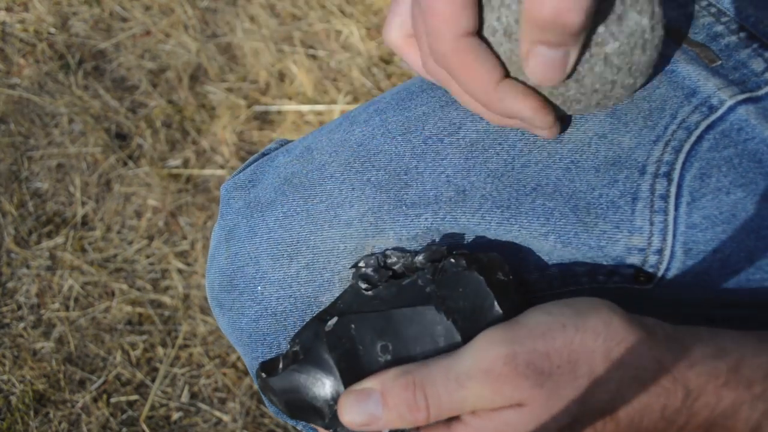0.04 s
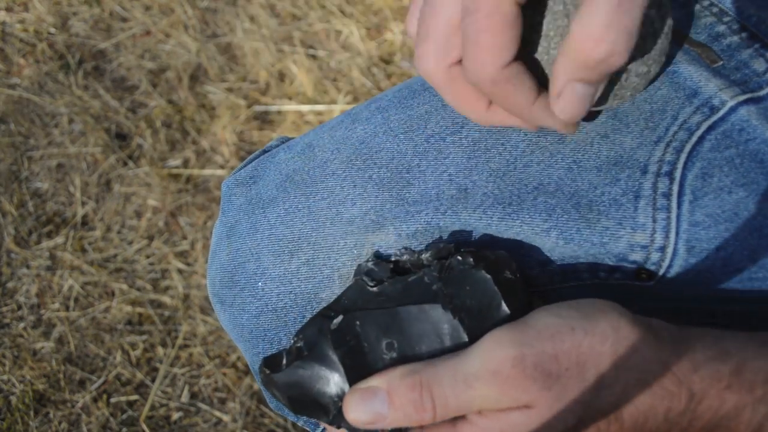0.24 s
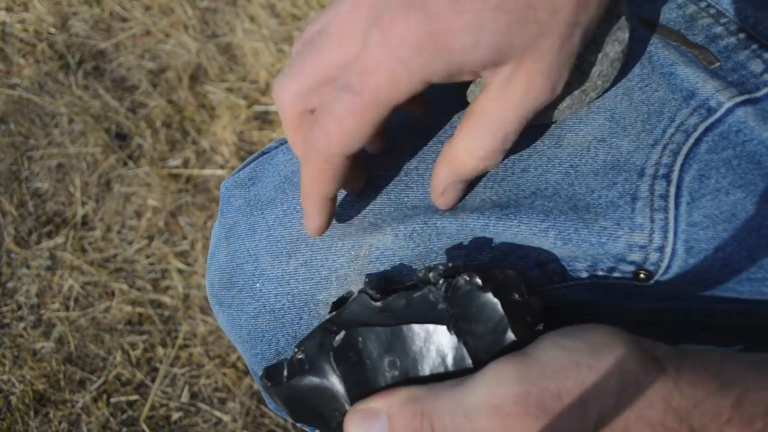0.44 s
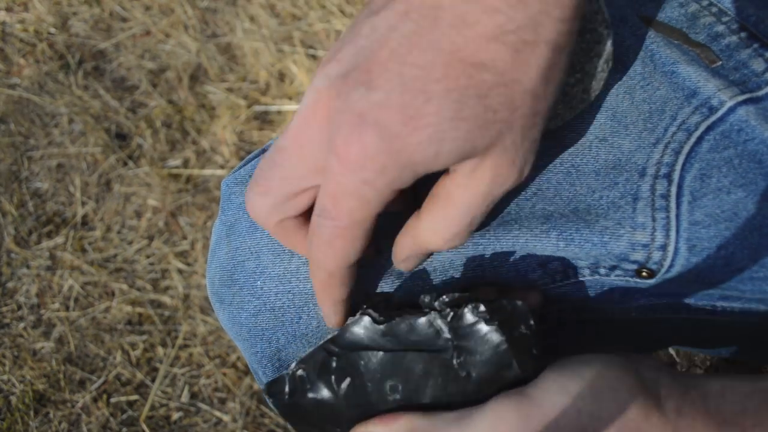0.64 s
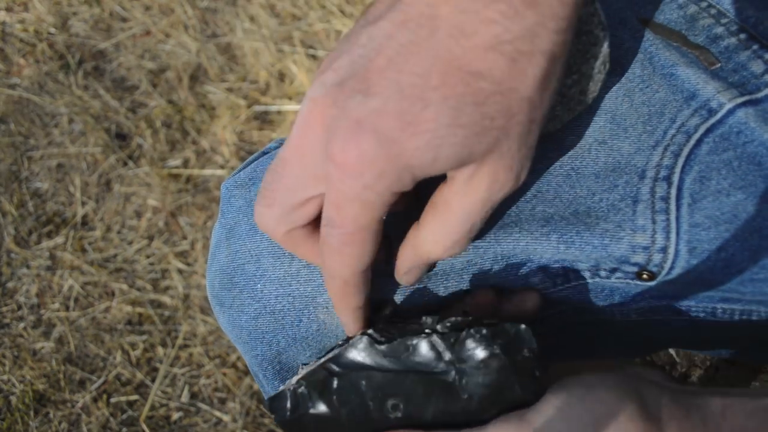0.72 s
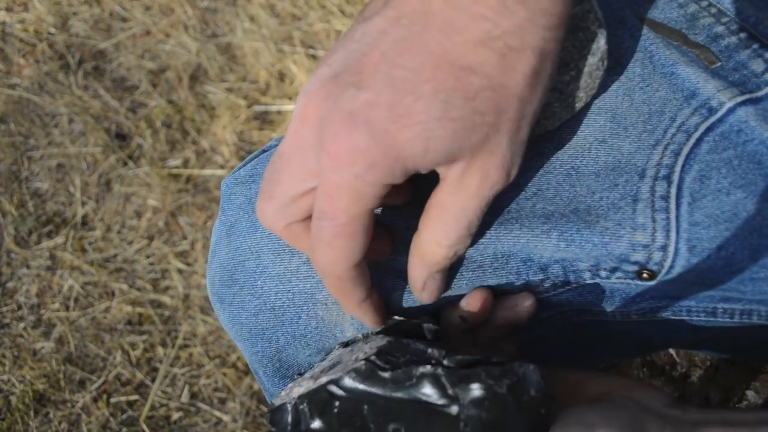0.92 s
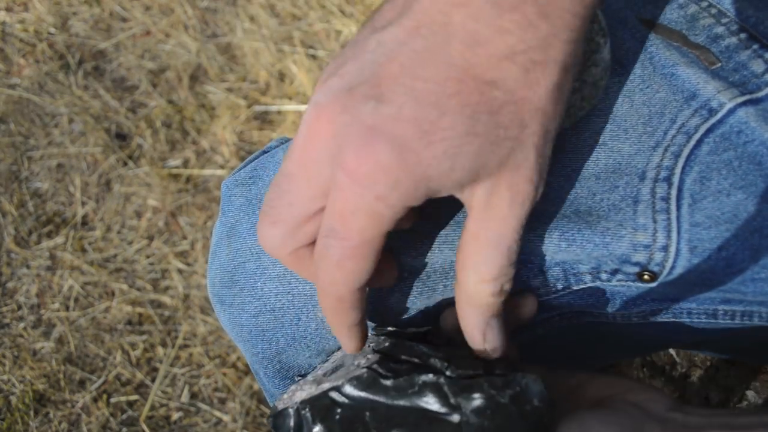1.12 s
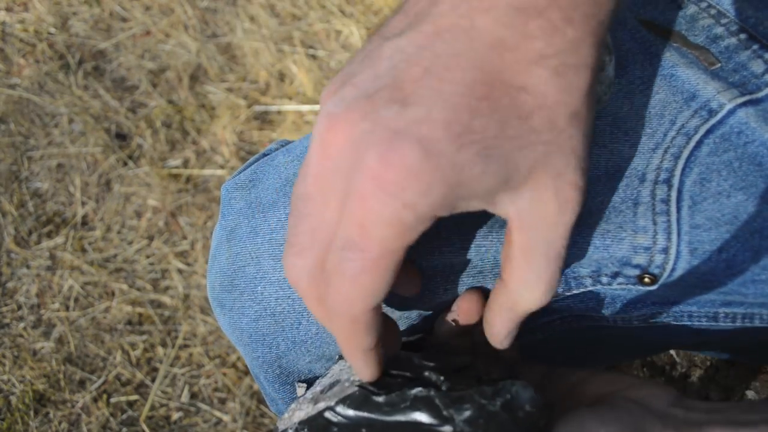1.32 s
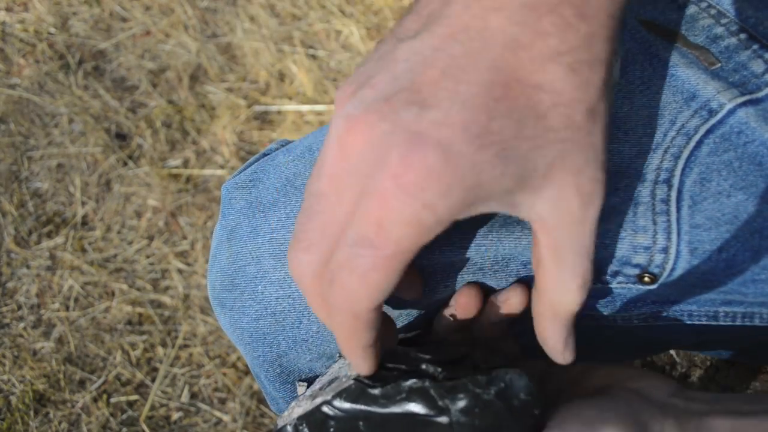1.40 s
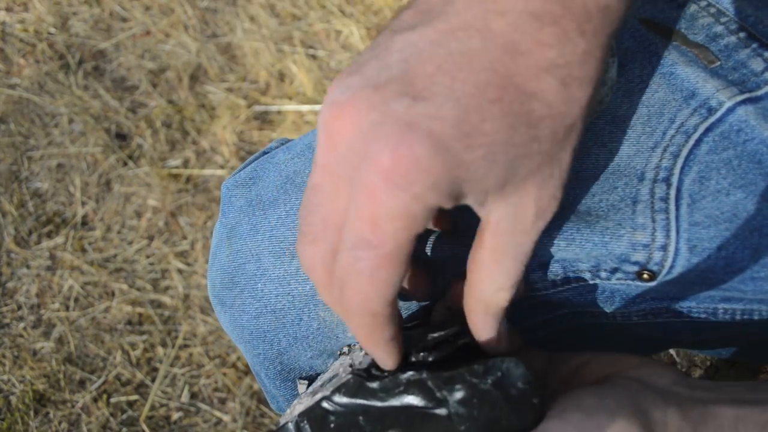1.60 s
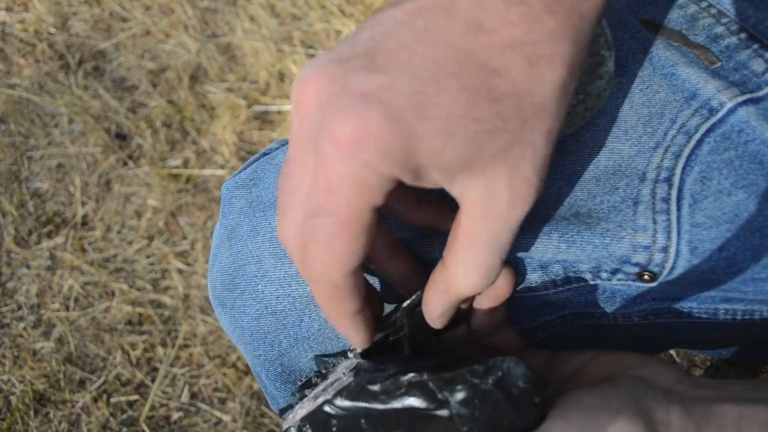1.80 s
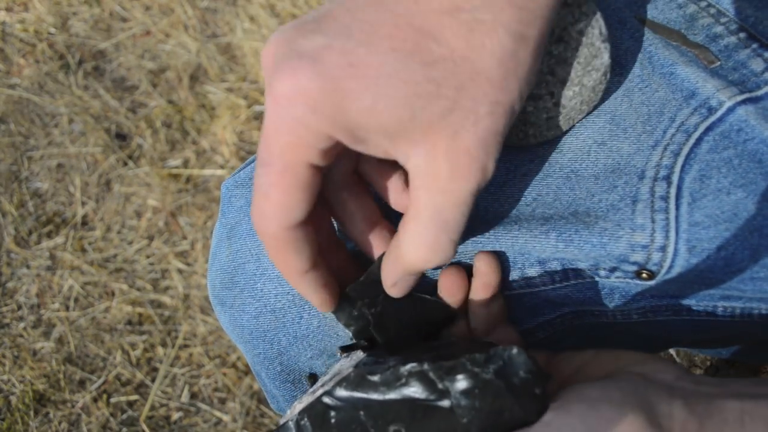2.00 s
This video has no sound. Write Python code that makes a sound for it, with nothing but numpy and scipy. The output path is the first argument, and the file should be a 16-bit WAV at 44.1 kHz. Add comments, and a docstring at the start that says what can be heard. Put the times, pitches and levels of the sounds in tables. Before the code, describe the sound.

Glassy flake scraping and clinking on stone, brittle high ticks and faint hand rubbing on denim

```python
"""A sharp glassy flake clinks and scrapes on a stone core: noise bursts ring short high modes near 9 kHz.
Hands rub skin, cloth and stone on denim: grainy friction noise in treble, upper mids and low mids.
Dry ticks of grit are clicks with a dying chatter; fingers tap the cloth as noise puffs in a low resonance.
Outdoors, far rumble and faint hiss lie below as steady coloured noise; the treble has a broad peak near 9 kHz."""
import sys
import numpy as np
from scipy import signal
from scipy.fft import rfft, irfft
from scipy.io import wavfile

SR = 44100
rng = np.random.default_rng(int(sys.argv[2]) if len(sys.argv) > 2 else 0)


def wav_out(sig):
    """Save sig, one row per channel (or a flat mono array), as 16-bit PCM at SR to the path in sys.argv[1]."""
    wavfile.write(sys.argv[1], SR, np.round(np.clip(np.atleast_2d(sig).T, -1, 1) * 32767).astype(np.int16))


N = 90581

GRIP_S, SCRAPE_S, LIFT_S = 1.2, 1.56, 1.79   # flake gripped, dragged hard, lifted free
CLICK_OVER_CHATTER = 4.0   # first sample of ticks and taps, re unit noise


def amp(db):
    """dB to gain."""
    return 10 ** (np.asarray(db) / 20)


def rms_one(x):
    """Scale to rms 1."""
    return x / np.sqrt(np.mean(x ** 2) + 1e-20)


def peak(x, hz, wide_hz):
    """Two-pole resonance, about unit gain on top."""
    r = np.exp(-np.pi * wide_hz / SR)
    zeros = [(1 - r * r) / 2, 0, (r * r - 1) / 2]
    poles = [1, -2 * r * np.cos(2 * np.pi * hz / SR), r * r]
    return signal.lfilter(zeros, poles, x + 1e-18)


def band(x, low_hz, high_hz=None):
    """Butterworth band-pass, or high-pass without a top edge."""
    edges, kind = ([low_hz, high_hz], "band") if high_hz else (low_hz, "high")
    return signal.sosfilt(signal.butter(2, edges, kind, fs=SR, output="sos"), x + 1e-18)


TREBLE_HZ, TREBLE_STAGE_WIDE_HZ = 8590, 3970   # broad treble peak, default centre
TOP_END_HZ, SKIRT_DB = 11500, -22   # flat top end above the peak


def treble(x, hz=TREBLE_HZ):
    """Broad two-stage peak over a flat top end."""
    peaked = peak(peak(x, hz, TREBLE_STAGE_WIDE_HZ), hz, TREBLE_STAGE_WIDE_HZ)
    return peaked + amp(SKIRT_DB) * band(x, TOP_END_HZ)


UPPER_HZ, UPPER_EDGE_HZ = 4786, 4200
UPPER_WIDE_HZ, RUB_UPPER_WIDE_HZ = 1378, 4500   # per stage


def upper(x, wide_hz):
    """Upper mids: two-stage resonance, cut steeply below."""
    peaked = peak(peak(x, UPPER_HZ, wide_hz), UPPER_HZ, wide_hz)
    return band(band(peaked, UPPER_EDGE_HZ), UPPER_EDGE_HZ)


LOW_HZ, LOW_HZ_REACHING, LOW_WIDE_HZ = 2157, 2778, 1565   # REACHING: before the grip


def low(x, hz):
    """Low mids of the hand: two-stage resonance, cut below."""
    return band(peak(peak(x, hz, LOW_WIDE_HZ), hz, LOW_WIDE_HZ * 2), 1040)


# far rumble and hiss, relative spectrum: f/Hz, level/dB per Hz
AIR_SPECTRUM = [(25, -12), (50, -13.5), (70, 4.5), (86, -6.5), (106, -0.5), (190, -12), (700, -19.5),
                (1200, -21.5), (1600, -24.5), (4000, -45.5), (9000, -28), (16000, -36)]
AIR_RMS_DB = -56


def air():
    """Far rumble and hiss: white noise shaped in the spectrum."""
    hz, db = np.transpose(AIR_SPECTRUM)
    log_hz = np.log(np.fft.rfftfreq(N, 1 / SR) + 1)
    shape_db = np.interp(log_hz, np.log(np.r_[10, hz]), np.r_[db[0] - 20, db])
    noise = irfft(rfft(rng.standard_normal(N)) * amp(shape_db), N)
    return amp(AIR_RMS_DB) * rms_one(noise)


# ring pitch as grip and hand position shift: t/s, f/Hz
RING_PITCH = [(0, 10250), (.14, 9180), (.4, 9220), (.62, 9150), (.71, 8360), (.9, 9264), (1.06, 8965),
              (1.22, 8823), (1.275, 8525), (1.39, 8574), (1.52, 9190), (1.575, 8840), (1.62, 9070),
              (1.78, 8920), (2.05, 9860)]


def ring_hz(s):
    """Ring pitch at time s, interpolated."""
    return np.interp(s, *np.transpose(RING_PITCH))


RING_STAGE_WIDE_HZ = 687


def gliding_ring(x, multiple):
    """Two-stage resonance tracking a multiple of the ring pitch, retuned per block."""
    block = 128
    r = np.exp(-np.pi * RING_STAGE_WIDE_HZ / SR)
    out, state = np.zeros(N), np.zeros((2, 2))
    for i in range(0, N, block):
        hz = multiple * ring_hz(i / SR)
        row = [1, 0, -1, 1, -2 * r * np.cos(2 * np.pi * hz / SR), r * r]
        out[i:i + block], state = signal.sosfilt([row, row], x[i:i + block], zi=state)
    return out


GRAINS_PER_S, GRAIN_SPREAD_DB = 2900, 5.5
CLUMP_DB, CLUMP_SAMPLES = 4, 160   # level wander, catching and slipping


def friction(smooth_share):
    """Uneven random grains over smooth noise, catching and slipping every few ms."""
    sizes = amp(GRAIN_SPREAD_DB * np.minimum(rng.exponential(1, N), 3.0)) * rng.choice([-1, 1], N)
    grains = sizes * (rng.random(N) < GRAINS_PER_S / SR)
    knots = N // CLUMP_SAMPLES + 2
    clumps = np.interp(np.arange(N) / CLUMP_SAMPLES, np.arange(knots), rng.standard_normal(knots))
    return amp(CLUMP_DB * clumps) * (rms_one(grains) + smooth_share * rng.standard_normal(N))


SMOOTH_SHARE, SMOOTH_SHARE_LOW = 0.44, 0.906   # smooth noise re grain rms
RING_SHARE, RING_SHARE_SCRAPING = 0.25, 1.2   # ring re treble, before and after the grip
OVERTONE_DB, RUB_TOP_END_DB = -28, -16   # re ring, re treble
CLOTH_HZ, CLOTH_DB, CLOTH_DB_SCRAPING = 1059.3, -0.5, -7   # re hand; cloth quieter once gripped
# rubbing of skin, cloth and stone: t/s, treble rms level/dB, upper mids/dB re treble, low mids/dB re treble
RUB_LEVELS = [(0, -61, -19.5, -11), (0.1, -56.5, -10, -10), (0.16, -52, -8.5, -11),
              (0.221, -56.5, -6, -11.5), (0.25, -67.5, -2, -6.5), (0.32, -58, -9.5, -8),
              (0.44, -51.5, -12.5, -12), (0.6, -51.5, -17, -13), (0.66, -47, -30, -9.5),
              (0.704, -49.5, -2, -2.5), (0.716, -45.5, -22, -11), (0.8, -54.5, -7, -10.5),
              (0.9, -52.5, -33, -7), (0.97, -57, -21, -11.5), (1.03, -62.5, -4, 2),
              (1.075, -48.5, -30.5, -19), (1.1, -59, -21, -7), (1.15, -71.5, -4.5, 0),
              (1.209, -61, -9.5, -9.5), (1.222, -33.5, -10.5, -15), (1.243, -52.5, -6.5, -20),
              (1.29, -43, -36.5, -26), (1.305, -65.5, -11.5, -9), (1.35, -72.5, -1, -11),
              (1.383, -43.5, -12, -18), (1.441, -42, -8.5, -26), (1.48, -58.5, -26, -15),
              (1.514, -51, -11, -15.5), (1.562, -49, -10, -22), (1.58, -38, -14, -19),
              (1.64, -41, 1.5, -6.5), (1.687, -32.5, -11, -22.5), (1.723, -26.5, -6.5, -21.5),
              (1.74, -37, -14.5, -15), (1.757, -26.5, -15.5, -20), (1.781, -44, -10.5, -9.5),
              (1.84, -45.5, -19.5, -6.5), (1.87, -31.5, -39, -18), (1.9, -44, 0.5, -5.5),
              (1.98, -41, -15, -14.5), (2.01, -39, -58, -19), (2.05, -60, 4.5, -10.5)]


def rubbing():
    """Friction in three colours following the hands; ring and overtone stand out in the scrape."""
    s, db, upper_db, low_db = np.transpose(RUB_LEVELS)
    x, other = friction(SMOOTH_SHARE), friction(SMOOTH_SHARE_LOW)
    t = np.arange(N) / SR
    gripped = t > GRIP_S

    ring_shares = [RING_SHARE, RING_SHARE_SCRAPING]
    share = np.select([t < GRIP_S, t < LIFT_S], ring_shares, RING_SHARE_SCRAPING / 2)
    overtone = rms_one(gliding_ring(x, FLAKE_MODES[-1][0]))
    ring = rms_one(gliding_ring(x, 1)) + amp(OVERTONE_DB) * overtone
    top = (rms_one(treble(x)) + share * ring) / (1 + share)
    top = top + amp(RUB_TOP_END_DB) * rms_one(band(band(x, TOP_END_HZ), TOP_END_HZ))

    hand = np.where(gripped, rms_one(low(other, LOW_HZ)), rms_one(low(other, LOW_HZ_REACHING)))
    cloth_top_hz = CLOTH_HZ * 1.258
    cloth = rms_one(band(band(other, 752, cloth_top_hz), 752, cloth_top_hz))
    lows = hand + amp(np.where(gripped, CLOTH_DB_SCRAPING, CLOTH_DB)) * cloth

    uppers = upper(x + other, RUB_UPPER_WIDE_HZ)
    colours = ((db, top), (db + upper_db, uppers), (db + low_db, lows))
    return sum(amp(np.interp(t, s, level_db)) * rms_one(c) for level_db, c in colours)


def contacts(rows, chatter_s, click, top):
    """Per row: a click with exponentially dying chatter, in three colours at own peak levels."""
    length = 500
    fade = np.exp(-np.arange(length) / (chatter_s * SR))
    bursts = rng.standard_normal((len(rows), length)) * fade
    bursts[:, 0] = click
    out = np.zeros(N + length)
    for (s, db, upper_db, low_db), burst in zip(rows, bursts):
        i = int(s * SR) - 8   # start 8 samples early
        upper_wide_hz = UPPER_WIDE_HZ if GRIP_S < s < SCRAPE_S else RUB_UPPER_WIDE_HZ
        low_hz = LOW_HZ if s > GRIP_S else LOW_HZ_REACHING
        colours = ((top(burst, s), db),
                   (upper(burst, upper_wide_hz), db + upper_db),
                   (low(burst, low_hz), db + low_db))
        for sound, level_db in colours:
            out[i:i + length] += amp(level_db) * sound / np.abs(sound).max()
    return out[:N]


TICK_CHATTER_S = 0.000702   # decay to 1/e
# dry ticks of grit: t/s, treble peak level/dB, upper mids/dB re treble, low mids/dB re treble
GRIT_TICKS = [(0.0907, -28.5, -26.5, -15.5), (0.2247, -32, -20.5, -19.5), (0.4447, -30, -8, -8.5),
              (0.5146, -46.5, -21.5, 13.5), (0.5722, -23.5, -10, -17.5), (0.6299, -28, -34, -25.5),
              (0.6538, -26.5, -11.5, -20), (0.6574, -30, -7.5, -13.5), (0.666, -36, -8.5, -3.5),
              (0.6837, -29, -29, -26.5), (0.69, -25.5, -14, -12), (0.6951, -18, -37, -36),
              (0.7014, -29, -17.5, -35), (0.7075, -21.5, -17, -8.5), (0.7652, -27, -15.5, -16.5),
              (0.8823, -31.5, -32, -37), (0.8907, -37, 3, -5.5), (0.9025, -23, -34.5, -32.5),
              (0.9531, -24.5, -27.5, -20.5), (0.9638, -24, -39, -32), (0.9858, -19.5, -22.5, -20.5),
              (1.0083, -31.5, -24, -22), (1.07, -24.5, -29.5, -28), (1.1106, -37, -6, -25),
              (1.833, -30.5, -22.5, -25.5), (1.7926, -22.5, -24.5, -28), (1.7996, -17.5, -12, -23),
              (1.8264, -23.5, -27.5, -34), (1.8707, -11, -28, -23), (1.9006, -30.5, -20.5, -28.5),
              (1.9082, -19.5, -26, -14), (1.9427, -22.5, -35, -13.5), (1.9544, -27, -33, -12),
              (1.9617, -40, -27.5, -24.5), (2.0036, -21.5, -11, -16), (2.0089, -30, 1, -14.5),
              (2.025, -43, -5, 1)]


def ticks():
    """Dry grit contacts, treble centred on the ring pitch."""
    return contacts(GRIT_TICKS, TICK_CHATTER_S, CLICK_OVER_CHATTER, lambda x, s: treble(x, ring_hz(s)))


TAP_DECAY_S = 0.0067   # to 1/e
# soft finger taps on cloth: t/s, peak level/dB, f/Hz
FINGER_TAPS = [(0.223, -46.5, 1190), (0.278, -46.5, 725), (0.787, -43.5, 1023), (0.694, -41.5, 1050),
               (0.822, -46.5, 413), (0.874, -39.5, 846), (0.901, -44.5, 1110), (0.953, -42, 1010)]


def taps():
    """Dull knocks: a fading noise puff through a low resonance plus a low band."""
    length = 1500
    out, t = np.zeros(N), np.arange(length) / SR
    for (s, db, hz), puff in zip(FINGER_TAPS, rng.standard_normal((len(FINGER_TAPS), length))):
        fading = np.r_[CLICK_OVER_CHATTER, puff[1:]] * np.exp(-t / TAP_DECAY_S)
        knock = peak(fading, hz, hz / 2) + 0.647 * band(fading, 258, 1160)
        out[int(s * SR):][:length] += amp(db) * knock / np.abs(knock).max()
    return out


# flake modes: f/ring pitch, level/dB before random spread, t60/s
FLAKE_MODES = [(0.801, -6, 0.0096), (0.962, -0.5, 0.0143), (1.048, 0, 0.00283), (1.62, 5, 0.0045)]


def clink_colour(x, s):
    """Flake modes round the ring pitch, strengths redrawn per clink."""
    spread_db = rng.normal(0, 3, len(FLAKE_MODES))
    rings = 0
    for (multiple, db, t60_s), extra_db in zip(FLAKE_MODES, spread_db):
        wide_hz = np.log(1000) / np.pi / t60_s
        rings = rings + amp(db + extra_db) * peak(x, multiple * ring_hz(s), wide_hz)
    return treble(rms_one(rings) + 0.095 * rms_one(x), ring_hz(s))


CLINK_CHATTER_S, CLINK_LOW_DB = 0.000987, -34   # decay to 1/e; low mids re treble
# clinks of flake on core: t/s, treble peak level/dB, upper mids/dB re treble
FLAKE_CLINKS = [(1.0555, -8.5, -28.5), (1.0593, -12.5, -41.5), (1.0591, -10.5, -45), (1.0626, -17.5, -44),
                (1.2154, -26, -33.5), (1.2218, -28.5, 1.5), (1.2345, -39.5, 5.5), (1.2464, -33.5, -28),
                (1.2793, -44, 5), (1.284, -37.5, 5), (1.2903, -32, -34), (1.365, -42, 12.5),
                (1.379, -37.5, 6), (1.3922, -27.5, -13.5), (1.406, -34.5, -29.5), (1.4108, -30, -28),
                (1.421, -29, -16.5), (1.4326, -25, -9), (1.4469, -32.5, -33), (1.463, -33, -13.5),
                (1.5223, -31, -32.5), (1.5448, -28.5, -15.5), (1.5523, -28.5, -31), (1.5746, -17.5, -10.5),
                (1.5783, -11.5, -17.5), (1.5831, -20.5, -5.5), (1.605, -22, -21.5), (1.6117, -22.5, -4.5),
                (1.6155, -18.5, -7), (1.6393, -22, -23), (1.6455, -25, 6), (1.6516, -20, -6),
                (1.6701, -14, -27), (1.6734, -12.5, -6), (1.6927, -12.5, -26.5), (1.7126, -18.5, -33.5),
                (1.7163, -15.5, -33.5), (1.7201, -21, -26.5), (1.7241, -13, -18.5), (1.7285, -16, -29),
                (1.7433, -11.5, -27.5), (1.745, -17, -34), (1.7487, -11, -19.5), (1.7535, -14, -38),
                (1.76, -17, -27.5), (1.8644, -23.5, -3), (1.8665, -16, -6.5), (1.9145, -24.5, -26.5)]


def clinks():
    """Flake on core: soft-edged bursts exciting the flake modes."""
    rows = [(*row, CLINK_LOW_DB) for row in FLAKE_CLINKS]
    return contacts(rows, CLINK_CHATTER_S, 0.68, clink_colour)


def scene():
    """Sum of all sources, one channel."""
    return (air() + rubbing() + ticks() + taps() + clinks())[None]


CUTOFF_HZ = 16050   # stopband edge


def record(dry):
    """Steep low-pass, 70 dB stopband."""
    return signal.sosfilt(signal.cheby2(20, 70, CUTOFF_HZ, fs=SR, output="sos"), dry)


dry = scene()
out = record(dry)
wav_out(out)
```